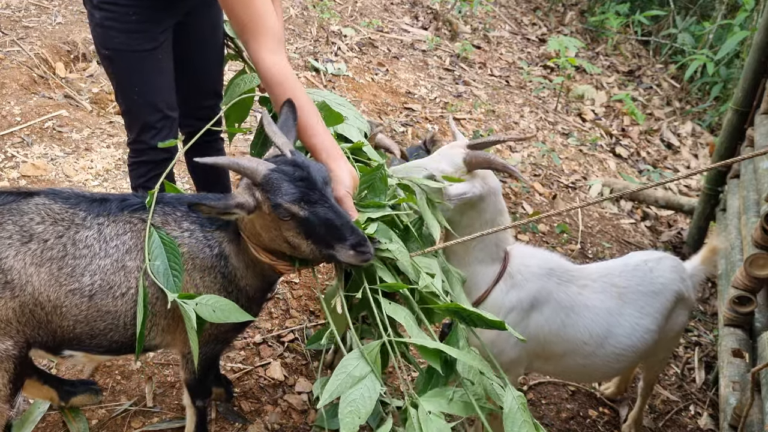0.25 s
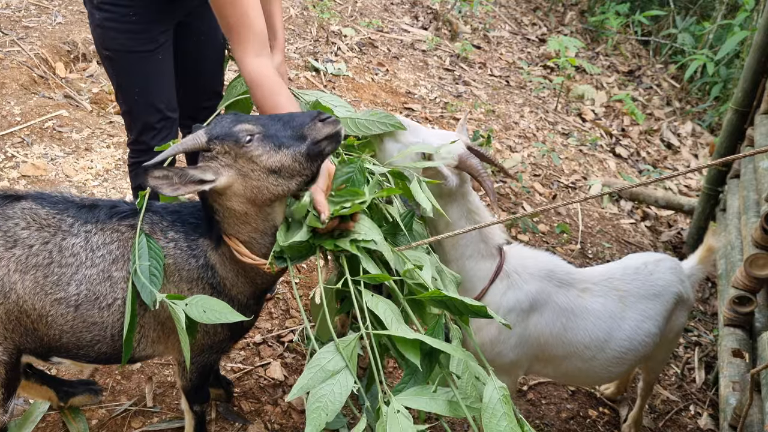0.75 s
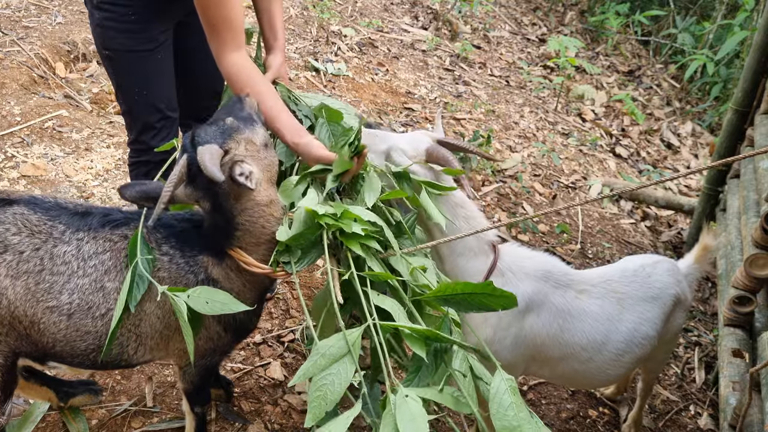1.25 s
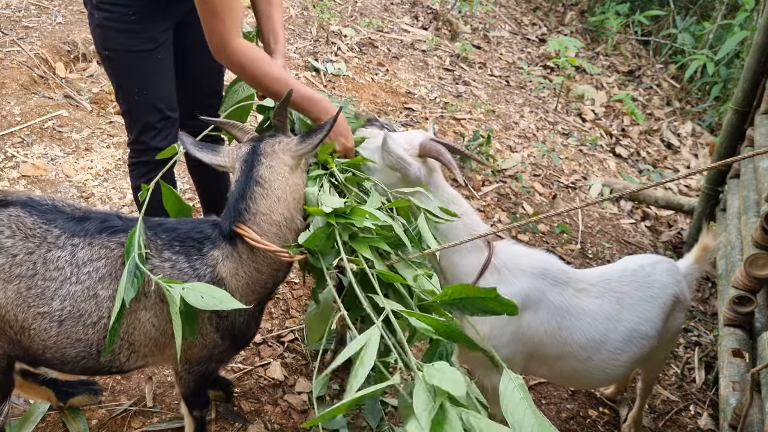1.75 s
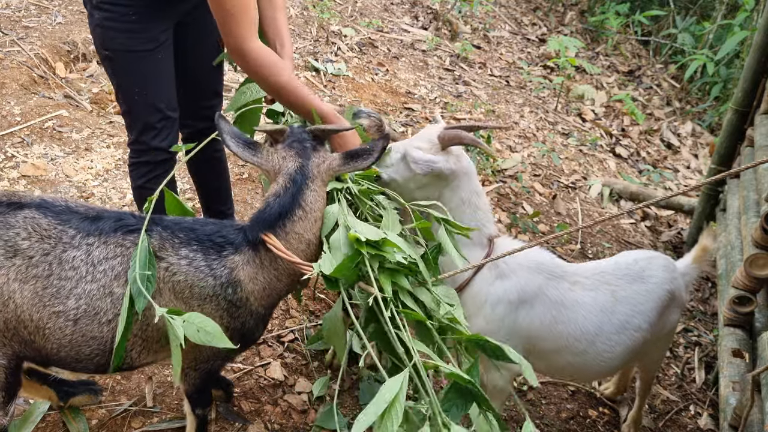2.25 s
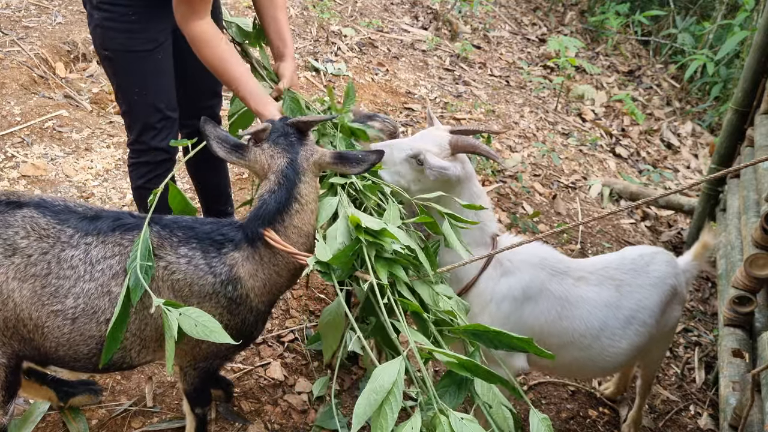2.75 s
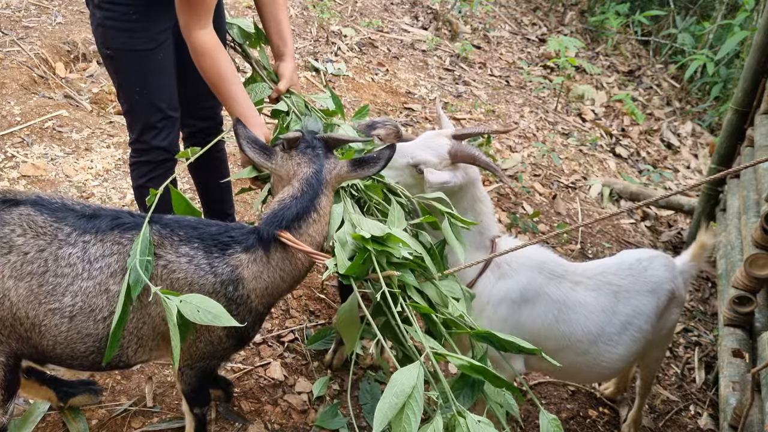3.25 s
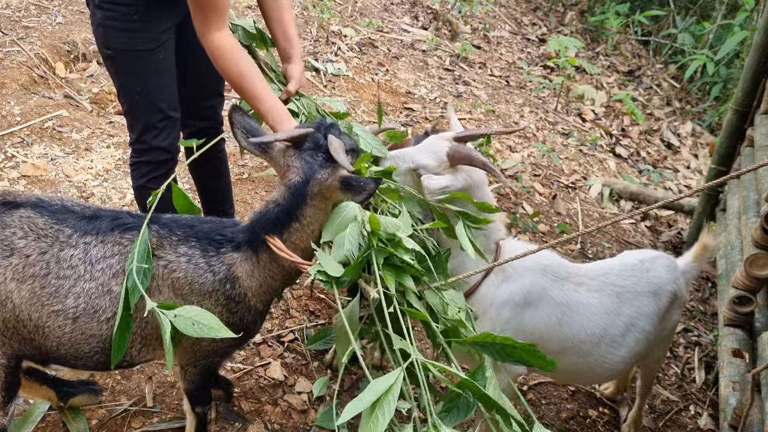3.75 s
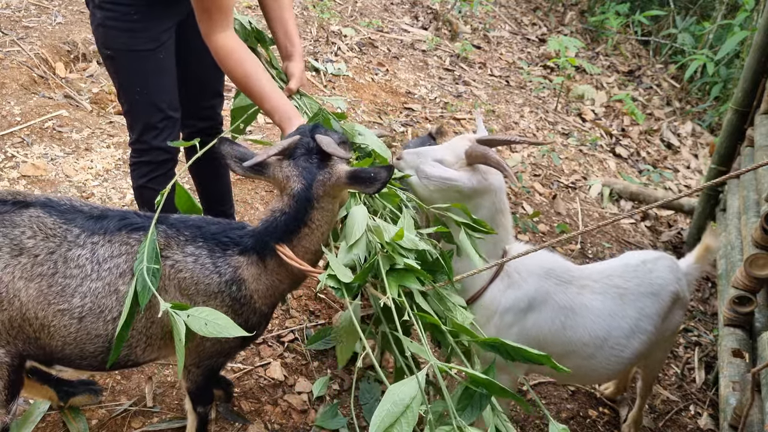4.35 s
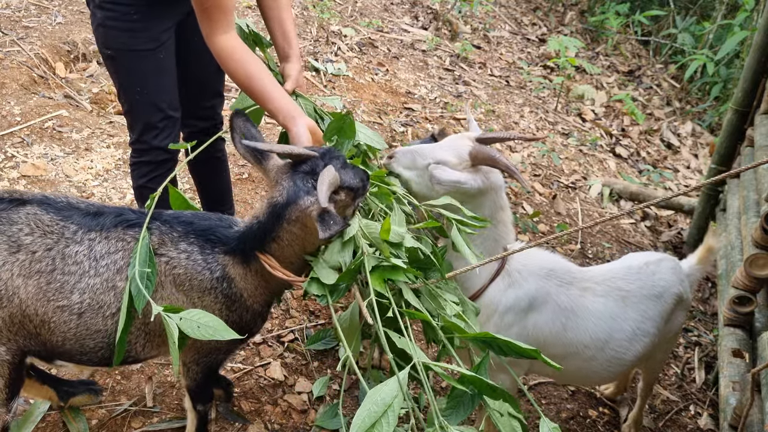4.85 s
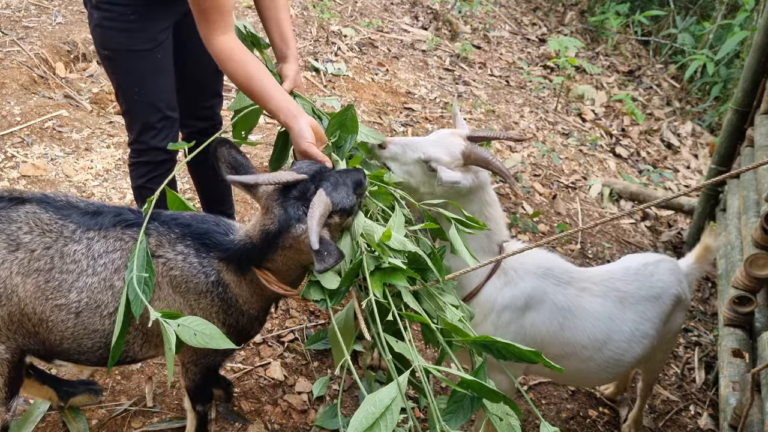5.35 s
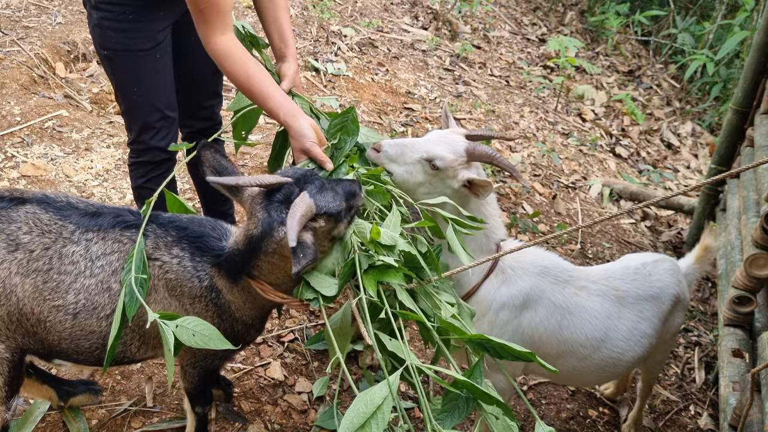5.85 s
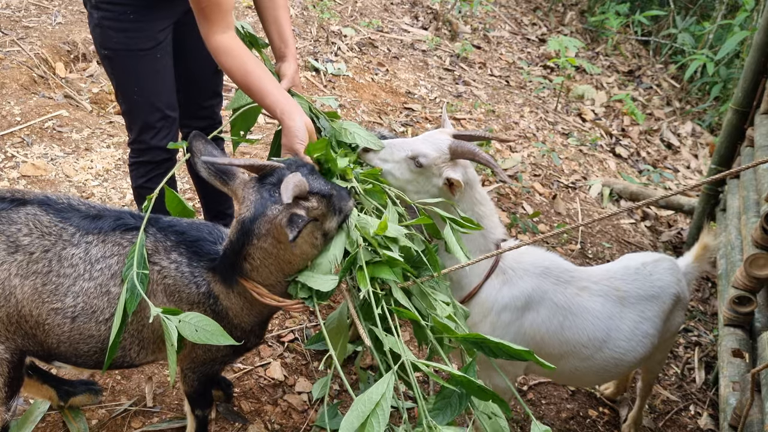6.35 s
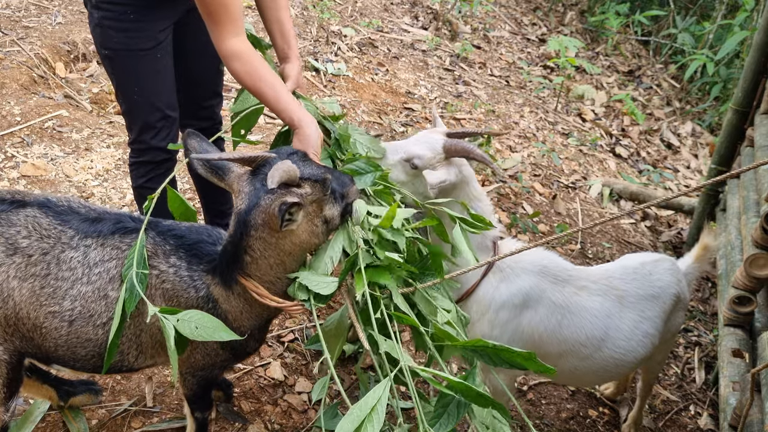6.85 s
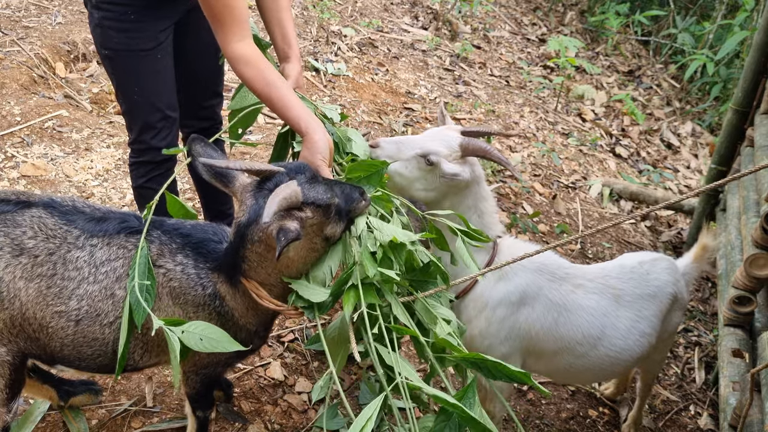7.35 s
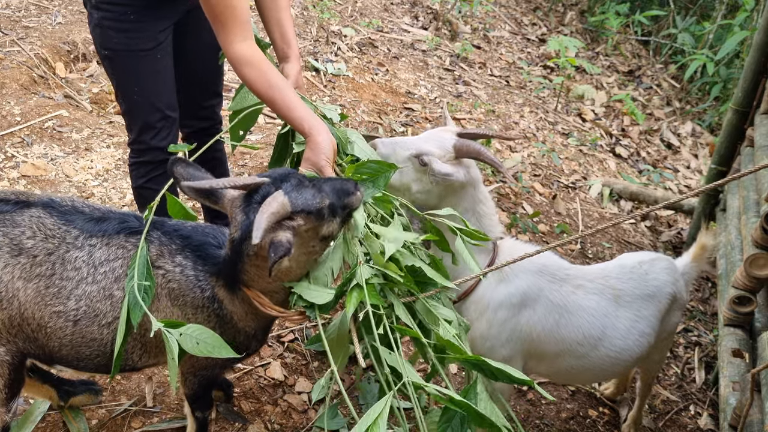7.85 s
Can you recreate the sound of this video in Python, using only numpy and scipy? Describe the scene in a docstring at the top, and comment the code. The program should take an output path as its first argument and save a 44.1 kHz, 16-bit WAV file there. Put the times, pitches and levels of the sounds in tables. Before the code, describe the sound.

Leafy branches rustle and crack as goats feed outdoors, with soft bumps, a single small bell clink, humming insects and distant bird whistles.

```python
"""Air murmurs and cicadas drone throughout as filtered noise; far birds whistle, from the first moment, as gliding tones.
From the start two goats tug at leafy branches: grains of noise rustle, and damped noise bumps for hooves and bodies.
After a second stems begin to snap and leaves to tear as short noise bursts, while one insect swells and sinks in pitch.
At two and a half seconds a collar bell, a sum of decaying modes that barely stirs otherwise, gets one clear stroke.
Towards the end the leaves brush less, while stems still rub, break and tear."""
import sys
import numpy as np
from scipy import signal
from scipy.fft import rfft, irfft, next_fast_len
from scipy.io import wavfile

SR = 44100
rng = np.random.default_rng(int(sys.argv[2]) if len(sys.argv) > 2 else 0)


def dump(signal):
    """Clip the signal to [-1, 1] and save it as 16-bit WAV at the path in sys.argv[1]."""
    limited = np.clip(np.atleast_2d(signal).T, -1, 1)
    pcm = np.round(limited * 32767).astype(np.int16)
    wavfile.write(sys.argv[1], SR, pcm)


N = 356769
T = np.arange(N) / SR  # time [s]

# Spectral levels are relative: the coloured sound is rescaled afterwards.

# Open-air murmur spectrum: (frequency [Hz], level [dB per Hz])
AIR_SPECTRUM = [(20, -38), (35, -12.5), (75, -1), (130, -4.5), (200, -5.5), (380, -8.5), (580, -3.5),
                (1100, -8), (2200, -10.5), (4500, -13.5), (7000, -41.5), (9200, -27), (15000, -21)]
# Cicada chorus resonances: (frequency [Hz], nominal width [Hz], level [dB], balance [dB])
CHORUS_RESONANCES = [(5694, 670, -57, 6), (6630, 120, -73, 16), (7850, 470, -82, 18)]
# One more insect that swells and sinks in pitch: (time [s], frequency [Hz], level [dB])
SOLO_INSECT = [(0, 8600, -104), (1.0, 8600, -79), (1.499, 8000, -68.5), (1.75, 7640, -68), (2.1, 7400, -67),
               (2.4, 7350, -79), (3, 7260, -110)]
# Single bird whistles: (start [s], length [s], start pitch [Hz], end pitch [Hz], level [dB])
WHISTLES = [(.04, .16, 4530, 4515, -60), (.46, .15, 4080, 4075, -65), (1.63, .06, 4150, 4330, -65),
            (2.35, .04, 4700, 4850, -65)]
# Bouts of a second bird that repeats one slurred call: (from [s], until [s])
CALL_BOUTS = [(-.05, .2), (1.95, 3.7), (5.91, 7.7)]
CALL_EVERY_S, CALL_DB = .495, -66
# Soft bumps of hooves and bodies: (time [s], peak level [dB], frequency [Hz])
BUMPS = [(.284, -45.5, 246), (.539, -48, 367), (0.544, -47.5, 77.5), (.69, -52, 70), (1.369, -50, 166),
         (2.82, -47.5, 224), (2.949, -52, 80), (3.602, -54, 75.5), (4.02, -51, 90), (5.7, -51.5, 75),
         (6.031, -50.5, 177), (6.64, -52.5, 62), (7.784, -46.5, 290), (7.834, -50, 220)]
# Decay time at 100 Hz, and the power of the pitch by which it shortens: deeper bumps last longer
BUMP_DECAY_S, BUMP_SHORTENING = 0.051, 0.68
# Bell modes, close pairs beat: (frequency [Hz], level [dB], 60 dB decay time [s], balance [dB])
BELL_MODES = [(1452.5, -20.5, .37, -3), (1465.9, -13.8, .37, -2.4), (3797, -46, .28, -6),
              (3930, -44, .38, -8), (3915, -31, .06, -10), (4030, -36, .04, -9), (7217, -47, .22, 2),
              (7321, -33.5, .17, 4), (9140, -55, .2, -1), (9727, -46, .1, 3), (10213, -47.5, .11, 0),
              (11552, -46, .07, 0), (12425, -42, .12, 7), (13824, -42.5, .09, 2)]
# Clapper contacts: (time [s], strength [dB])
CLAPPER_CONTACTS = [(.025, -49), (.08, -50), (.14, -49), (.22, -49), (2.5372, 0), (3.745, -47)]
# Spectrum of the clapper's tick: (frequency [Hz], level [dB per Hz])
TICK_SPECTRUM = [(1000, -8), (3000, -9), (4900, 4), (6000, -4), (9000, -8), (14500, -15)]
# Soft contacts are dull: treble loss per octave, as a share of how much softer they are
SOFT_DULLING = .2
# Stirring of the branches: (time [s], level relative to a firm tug [dB])
STIRRING = [(0, -5.5), (.36, -9), (.68, -5.5), (1.02, -12), (1.25, -3), (1.7, 0), (2.08, -0.5), (2.29, -10),
            (2.55, 5), (3.1, -4.5), (3.7, -0.5), (4.38, -8), (4.82, -1.5), (5.45, -7), (6.05, -3.5),
            (6.72, -7), (7.05, 1), (7.48, -6.5), (8.09, -3)]
# Share of brushing leaves, most while the bundle is swung about: (time [s], leafiness [dB])
LEAFINESS = [(0, 2), (1.6, 1), (3.7, 0), (4.7, 0), (5.4, -10), (8.09, -10)]
# Spectrum of stems rubbing on each other: (frequency [Hz], level [dB per Hz])
RUB_SPECTRUM = [(200, -15), (600, -1.5), (1200, 0.5), (1800, 3), (2500, -7.5), (5000, -3), (15000, -46)]
# Spectrum of leaves sliding over each other: (frequency [Hz], level [dB per Hz])
BRUSH_SPECTRUM = [(500, -15), (1800, -8), (2700, 5.5), (3400, 5.5), (5000, -3), (8000, -22), (15000, -14)]
# Spectrum of crisp leaf edges ticking: (frequency [Hz], level [dB per Hz])
CRACKLE_SPECTRUM = [(600, -15.5), (3000, 0), (7500, 3), (9500, -2), (14500, 3), (16000, -11)]
# Thin leaf ribs: chances per second, peak level in a firm tug, median resonance, breaking time
RIBS_PER_S, RIB_DB, RIB_HZ, RIB_S = 2.2, -46.5, 3200, 0.0044
# Leaves torn off: (hardest pull [s], level [dB], stem resonance [Hz], dying time [s])
TORN_LEAVES = [(2.145, -39, 2730, 0.02), (2.845, -52, 3500, 0.016), (4.042, -44.5, 2340, 0.029),
               (6.035, -48, 2100, 0.043), (6.921, -53, 1700, 0.023), (7.337, -50, 1600, .016),
               (8.03, -55, 1500, .018)]
# The rise takes this share of the dying time
TEAR_RISE_SHARE, TEAR_SPLINTER_DB, TEAR_PAN_DB = 0.83, 7, 2
# Breaking stems: (time [s], peak level [dB], stem resonance [Hz], breaking time [s], balance [dB])
BREAKING_STEMS = [(1.227, -42, 3500, 0.016, 2), (1.535, -35, 5200, 0.0058, 6),
                  (1.537, -31, 3380, 0.0014, -9), (1.941, -36, 3000, .003, -2),
                  (2.129, -31, 2470, 0.0026, -1), (2.152, -21.5, 3240, .0008, -7),
                  (2.484, -41.5, 4200, .004, 0), (2.663, -41, 2780, .0068, 3),
                  (2.8179, -37.5, 4200, .012, 6), (3.475, -45.5, 2000, .006, 13),
                  (4.0125, -29, 3200, 0.0012, -2), (4.021, -35.5, 1580, 0.0027, 0),
                  (4.829, -41.5, 3970, .003, 2), (5.514, -48, 9000, .004, 3), (5.63, -43, 1490, 0.0027, 3),
                  (6.0194, -37.5, 1620, 0.0032, -5), (6.8779, -33, 1680, 0.0037, 0),
                  (6.9532, -37.5, 1800, 0.0047, 0), (6.9724, -31, 1730, 0.0032, -8),
                  (6.9733, -31, 5940, 0.0088, 3.5), (7.5024, -30, 5100, 0.002, 8),
                  (7.515, -28.5, 13900, .0018, -2)]
# Spectrum of splintering fibres: (frequency [Hz], level [dB per Hz])
SPLINTER_SPECTRUM = [(150, -15), (700, 8.5), (1600, 6.5), (5500, 4.5), (8000, -1.5), (9500, -10),
                     (14500, 0), (16000, -29)]
# Slow breaks splinter more: splinters equal the stem's ring at this breaking time
SPLINTERY_S, SPLINTER_DB_PER_DOUBLING = .0045, 3
# Difference in colour between the two microphones: (frequency [Hz], balance [dB])
MICROPHONE_BALANCE = [(1500, -0.5), (3500, -0.5), (5500, -3.5), (7500, 9), (10000, 5.5), (14000, -1)]
TOP_HZ = 15700


def undb(db):
    """Decibel law: a level becomes an amplitude ratio."""
    return 10 ** (np.asarray(db) / 20)


def unit(x):
    """Normalisation: scale to an rms of 1."""
    return x / np.sqrt(np.mean(x ** 2))


def curve(points, at=T):
    """Linear interpolation of a (time, value) curve."""
    return np.interp(at, *np.transpose(points))


def pan(db):
    """Intensity stereo: left and right gains for a level difference, with a mean of 1."""
    gains = undb(np.array([[db], [-db]]) / 2)
    return gains / gains.mean()


def add(out, start, x):
    """Superposition: mix a sound in at a time, cut at both ends of the scene."""
    i = int(round(start * SR))
    x, i = x[:, max(-i, 0):], max(i, 0)
    out[:, i:i + x.shape[1]] += x[:, :N - i]


def colour(x, points):
    """Linear filtering: weight the spectrum by a (frequency, level) curve."""
    size = next_fast_len(x.shape[-1])
    hz, db = np.transpose(points)
    f = np.arange(size // 2 + 1) * SR / size
    gain = undb(np.interp(np.log(f + 1), np.log(hz), db))
    return irfft(rfft(x, size) * gain, size)[..., :x.shape[-1]]


def resonate(x, hz, width):
    """Simple resonance: a two-pole filter passes a band around its centre."""
    b, a = signal.iirpeak(hz, hz / min(width, SR / 4), fs=SR)
    return signal.lfilter(b, a, x)


def walk(rate):
    """Random fluctuation: straight lines join Gaussian knots, rate of them a second."""
    knots = rng.standard_normal(int(rate * N / SR) + 2)
    return np.interp(T * rate, np.arange(len(knots)), knots)


def noise_pair(size, likeness):
    """Partial coherence: left and right noise share a middle part set by the likeness."""
    mid, side = rng.standard_normal((2, size))
    c = np.clip(likeness, 0, 1)
    return (np.sqrt(1 + c) * mid + np.sqrt(1 - c) * np.array([side, -side])) / np.sqrt(2)


def scatter(x, t60):
    """Diffuse reflection: convolution with decaying noise, different at each side."""
    tail = rng.standard_normal((2, SR)) * np.exp(-np.log(1000) * T[:SR] / t60)
    return signal.fftconvolve(x, unit(tail) / np.sqrt(SR), axes=1)[:, :N]


def air(level_db=-59.0, merge_hz=480):
    """Coherence falls with frequency: the bass is alike at both sides, the rest diffuse; both lean left."""
    low = signal.butter(2, merge_hz, fs=SR, output="sos")
    high = signal.butter(2, merge_hz, "high", fs=SR, output="sos")
    bass = pan(4) * signal.sosfilt(low, noise_pair(N, likeness=.82)) * undb(1.1 * walk(6))
    diffuse = pan(1.5) * signal.sosfilt(high, noise_pair(N, likeness=0.01)) * undb(0.68 * walk(4.3))
    return unit(colour(bass + diffuse, AIR_SPECTRUM)) * undb(level_db)


def cicada_chorus(flutter_db=1.08, lag_s=.00037):
    """Resonant filtering: countless tymbal clicks merge into noise in narrow bands."""
    out = 0
    for hz, nominal_width, db, pan_db in CHORUS_RESONANCES:
        width = 1.13 * nominal_width
        drone = unit(resonate(resonate(noise_pair(N, likeness=0.1), hz, width), hz, width))
        level_db = db + flutter_db * walk(45) + .5 * walk(3.6)
        out = out + pan(pan_db) * drone * undb(level_db)
    # the chorus reaches the left microphone later
    return np.array([np.roll(out[0], int(lag_s * SR)), out[1]])


def solo_insect(width_hz=300):
    """Amplitude modulation: low-passed noise on a carrier makes a rasp that slides down in pitch."""
    s, *columns = np.transpose(SOLO_INSECT)
    hz, db = (np.interp(T, s, column) for column in columns)
    low = signal.butter(2, width_hz, fs=SR, output="sos")
    rasp = unit(signal.sosfilt(low, rng.standard_normal((2, N))))
    carrier = np.sin(2 * np.pi * np.cumsum(hz) / SR)
    return pan(12) * rasp * carrier * undb(db)


def whistle(length, pitches_hz, waver=0.0039):
    """Frequency modulation: a near-pure note glides through a few pitches with a random waver."""
    u = np.linspace(0, 1, int(length * SR))
    glide_hz = np.interp(u, np.linspace(0, 1, len(pitches_hz)), pitches_hz)
    hz = glide_hz * (1 + waver * walk(91.3)[:len(u)])
    swell = np.sqrt(2 * np.abs(np.sin(np.pi * u)))
    return swell * np.sin(2 * np.pi * np.cumsum(hz) / SR)


def birds(call_s=0.25, drop_s=0.106, drop_after_s=0.14, drop_db=-5):
    """Reverberant field: far whistles and a quavering call reach us mostly by way of the trees."""
    out = np.zeros((2, N))
    for start, length, from_hz, to_hz, db in WHISTLES:
        add(out, start, pan(0) * whistle(length, [from_hz, to_hz]) * undb(db))
    for first, until in CALL_BOUTS:
        for start in np.arange(first, until, CALL_EVERY_S):
            # a rising note with a softer, lower ending
            note = whistle(call_s, [3700, 3720, 3760], waver=.034)
            ending = whistle(drop_s, [3500, 3330], waver=0.0315)
            add(out, start, pan(-1.0) * note * undb(CALL_DB))
            add(out, start + drop_after_s, pan(-1) * ending * undb(CALL_DB + drop_db))
    return 0.64 * out + 1.44 * scatter(out, t60=0.46)


def thuds(crest_db=-6, rise_s=0.0051):
    """Heavy damping: bumps on soft earth are broad resonances that die quickly, deeper ones later."""
    out, t = np.zeros((2, N)), T[:SR // 2]
    for start, db, hz in BUMPS:
        decay_s = BUMP_DECAY_S * (100 / hz) ** BUMP_SHORTENING
        width = 0.72 * hz
        body = unit(resonate(resonate(rng.standard_normal(len(t)), hz, width), hz, width))
        envelope = (1 - np.exp(-t / rise_s)) * np.exp(-t / decay_s)
        add(out, start, pan(4.6) * body * envelope * undb(db + crest_db))
    return out


def bell(cup_hz=1415, cup_width_hz=140, mouth_width_hz=500, attack_s=0.00073, tick_db=-43, tick_s=0.016):
    """Modal superposition: the clapper ticks and rings all modes, each with its own decay."""
    out, t = np.zeros((2, N)), T[:SR]
    for start, strength_db in CLAPPER_CONTACTS:
        dull_db = -strength_db * SOFT_DULLING  # per octave above the lowest mode
        for hz, db, t60, pan_db in BELL_MODES:
            decay = np.exp(-np.log(1000) * t / t60)
            ring = np.sin(2 * np.pi * hz * t) * (1 - np.exp(-t / attack_s)) * decay
            if hz < 2 * cup_hz:
                # the lowest pair sounds through the air in the cup, so it takes a moment to swell
                ring = resonate(resonate(ring, cup_hz, cup_width_hz), cup_hz, mouth_width_hz)
            octaves = np.log2(hz / BELL_MODES[0][0])
            add(out, start, pan(pan_db) * ring * undb(db + strength_db - dull_db * octaves))
        tick = unit(colour(noise_pair(len(t), likeness=.4), TICK_SPECTRUM)) * np.exp(-t / tick_s)
        add(out, start, tick * undb(tick_db + strength_db))
    return out


def grains(rate, spread_db, smear_s):
    """Shot noise: many tiny contacts of uneven size, each a short burst of its own."""
    sizes = undb(spread_db * np.minimum(rng.exponential(size=N), 3.5))
    ticks = sizes * (rng.random(N) < rate / SR)
    energy = signal.lfilter([1], [1, -np.exp(-1 / (smear_s * SR))], ticks ** 2)
    return unit(np.sqrt(energy) * noise_pair(N, likeness=0.039))


def leaves(rub_db=-62.0, brush_db=-62, crackle_db=-66, stem_share=0.32, crackle_growth=1.6, uneven_db=0.9):
    """Frictional excitation: one stir drives rubbing stems, sliding leaves and ticking crisp edges."""
    stir, leafy = curve(STIRRING), curve(LEAFINESS)
    rubbing = unit(colour(grains(rate=830, spread_db=5.5, smear_s=0.0054), RUB_SPECTRUM))
    sliding = unit(colour(grains(rate=430, spread_db=5.0, smear_s=0.012), BRUSH_SPECTRUM))
    ticking = unit(colour(grains(rate=420, spread_db=1.0, smear_s=0.00445), CRACKLE_SPECTRUM))
    # the less the leaves brush, the more the stems rub
    rubbing = rubbing * undb(rub_db + stir - stem_share * leafy)
    sliding = sliding * undb(brush_db + stir + leafy)
    ticking = ticking * undb(crackle_db + crackle_growth * stir)
    return (pan(0) * rubbing + pan(-2.6) * sliding + pan(0.72) * ticking) * undb(uneven_db * walk(14))


def fibres(force, hz, bright_db, stem_width=0.58, likeness=0.28):
    """Forced resonance: parting fibres ring the stem, splinters brighten it, and force sets the energy."""
    width = stem_width * hz
    stem = unit(resonate(resonate(noise_pair(len(force), likeness), hz, width), hz, width))
    splinters = unit(colour(noise_pair(len(force), likeness), SPLINTER_SPECTRUM))
    return unit((stem + undb(bright_db) * splinters) * force) * np.sqrt(np.mean(force ** 2))


def snap(hz, break_s, tail_s=.044, tail_db=-22, crest_db=-6, clean_s=0.0019, ring_s=0.001):
    """Sudden release: fibres part in a short burst; the quicker the break, the more is one clean click."""
    t = T[:SR // 6]
    # the long, weak tail is nearby leaves shivering
    force = np.exp(-t / break_s) + undb(tail_db) * np.exp(-t / tail_s)
    burst = fibres(force, hz, SPLINTER_DB_PER_DOUBLING * np.log2(break_s / SPLINTERY_S))
    clean = np.exp(-(break_s / clean_s) ** 2)
    click = 2 * np.sin(2 * np.pi * hz * t) * np.exp(-t / ring_s)
    return (clean * click + (1 - .5 * clean) * burst) * undb(crest_db)


def ribs(spread_db=2, spread_octaves=0.75, pan_spread_db=3):
    """Random failure: thin leaf ribs snap by chance, louder when the branches are stirred harder."""
    out = np.zeros((2, N))
    # one rib breaks at a random moment in each slot
    for slot in np.arange(0, N / SR - 1 / RIBS_PER_S, 1 / RIBS_PER_S):
        start = slot + rng.random() / RIBS_PER_S
        size, pitch, side = rng.standard_normal(3)
        hz = min(RIB_HZ * 2 ** (spread_octaves * pitch), SR / 4)
        level_db = RIB_DB + curve(STIRRING, start) + spread_db * size
        add(out, start, pan(pan_spread_db * side) * snap(hz, RIB_S) * undb(level_db))
    return out


def tears(jerks_per_s=220, jerk_db=4):
    """Progressive fracture: a leaf rips in little jerks that build to the hardest pull and die away."""
    out, lead = np.zeros((2, N)), T[SR // 6]
    t = T[:SR // 3] - lead  # zero at the hardest pull
    for peak, db, hz, dying_s in TORN_LEAVES:
        pull = np.exp(np.minimum(t / (TEAR_RISE_SHARE * dying_s), -t / dying_s))
        jerks = unit(undb(jerk_db * walk(jerks_per_s)[:len(t)]))
        rip = fibres(pull * jerks, hz, TEAR_SPLINTER_DB)
        add(out, peak - lead, pan(TEAR_PAN_DB) * rip * undb(db))
    return out


def snaps():
    """Brittle fracture: the stems that the goats bite through or break, each at its own resonance."""
    out = np.zeros((2, N))
    for start, db, hz, break_s, pan_db in BREAKING_STEMS:
        add(out, start, pan(pan_db) * snap(hz, break_s) * undb(db))
    return out


def scene(forest_db=-24, bell_echo_db=-31):
    """Direct and reflected sound: near sources with a faint forest echo, over the background."""
    background = air() + cicada_chorus() + solo_insect() + birds()
    clink = bell()
    feeding = thuds() + leaves() + ribs() + tears() + snaps()
    echo = scatter(undb(forest_db) * feeding + undb(bell_echo_db) * clink, t60=0.46)
    return background + echo + clink + feeding


def record(dry):
    """Transducer response: the two microphones differ in colour, and the recorder cuts the top."""
    hz, db = np.transpose(MICROPHONE_BALANCE)
    ports = [colour(x, np.c_[hz, sign * db / 2]) for x, sign in zip(dry, (1, -1))]
    top_cut = signal.ellip(8, .2, 70, TOP_HZ, fs=SR, output="sos")
    return signal.sosfilt(top_cut, ports)


dry = scene()
out = record(dry)
dump(out)
```